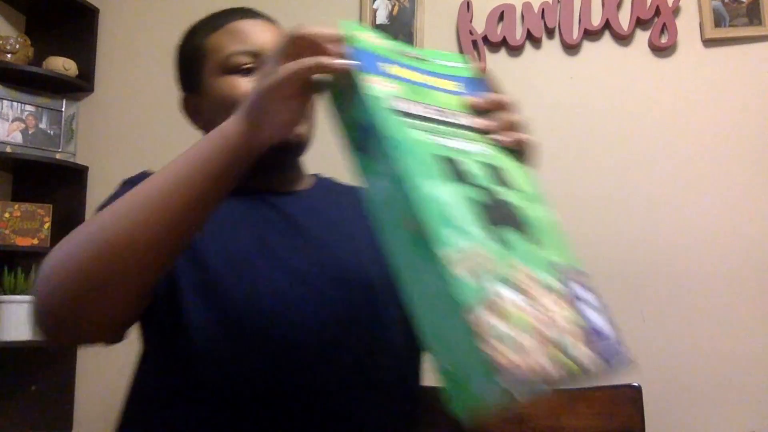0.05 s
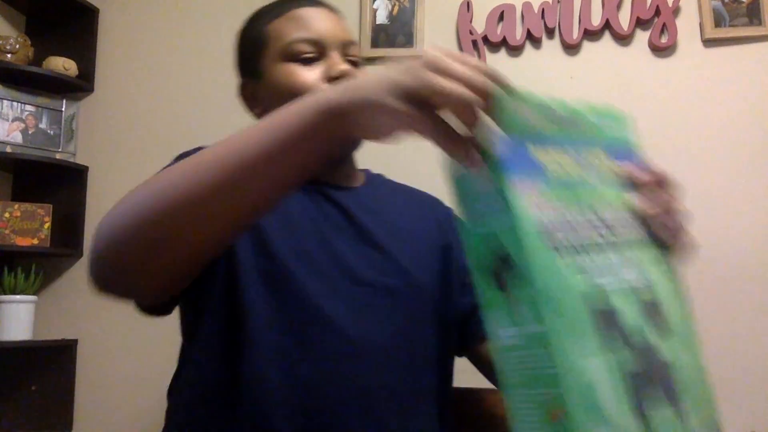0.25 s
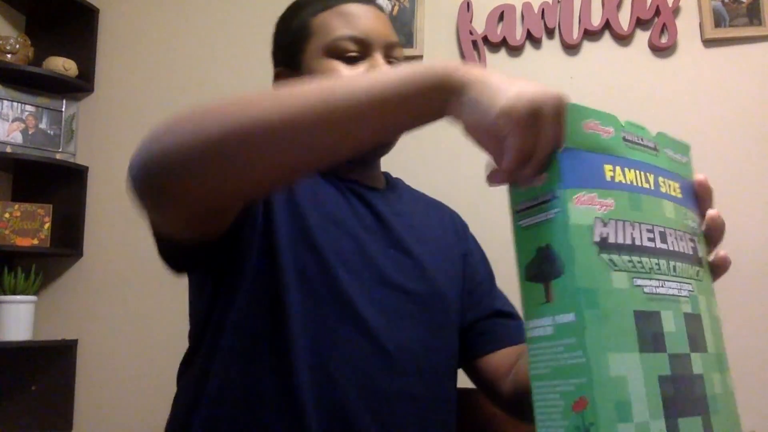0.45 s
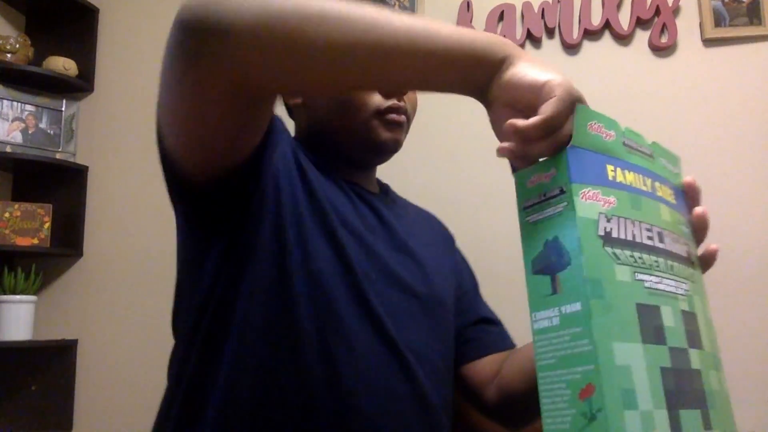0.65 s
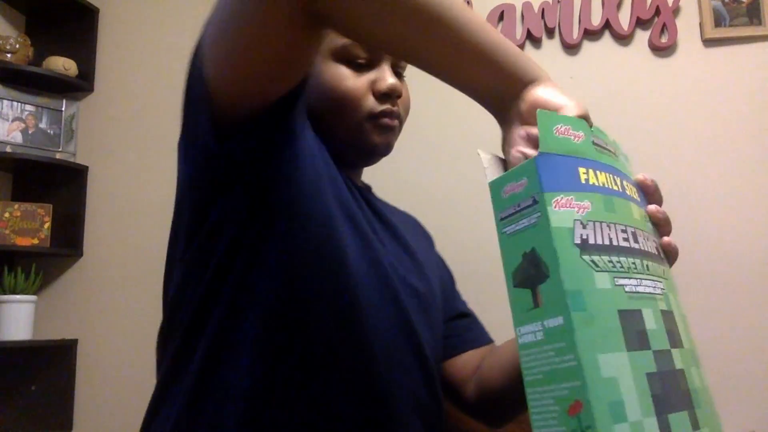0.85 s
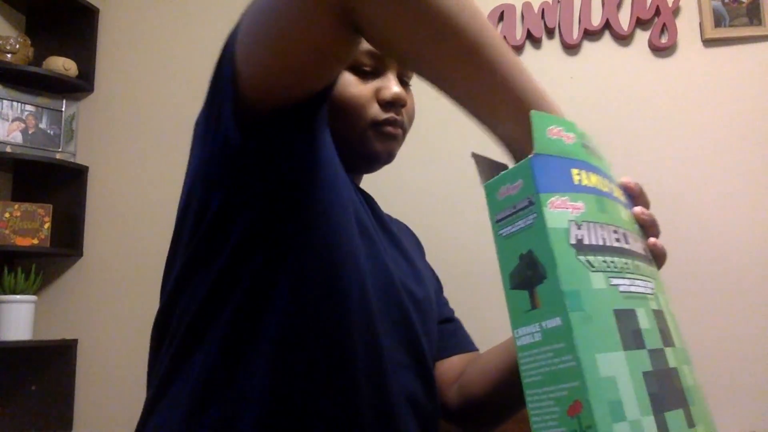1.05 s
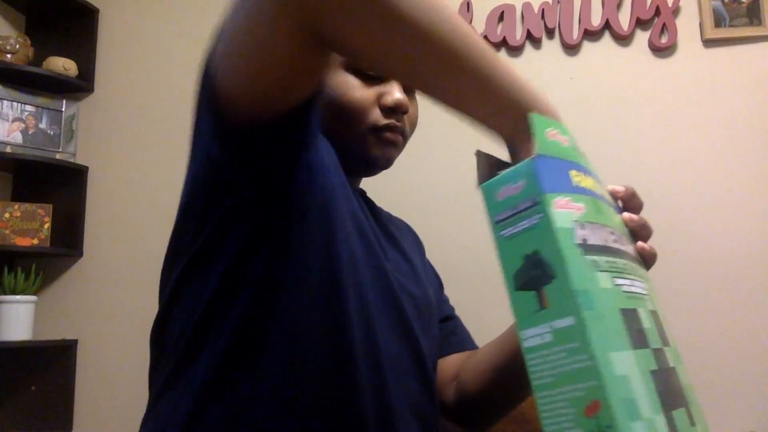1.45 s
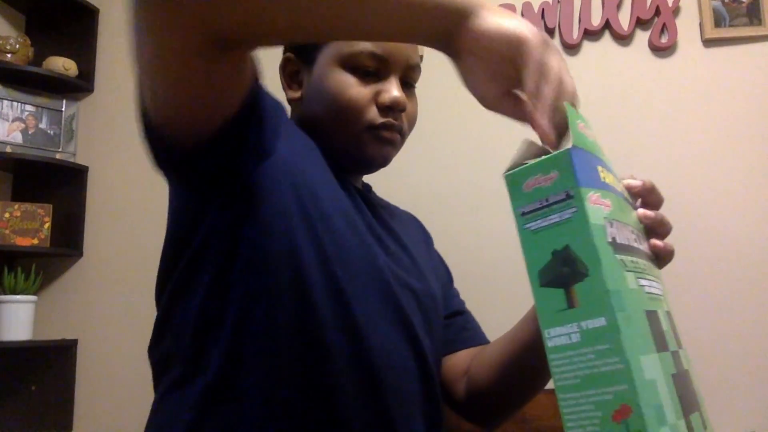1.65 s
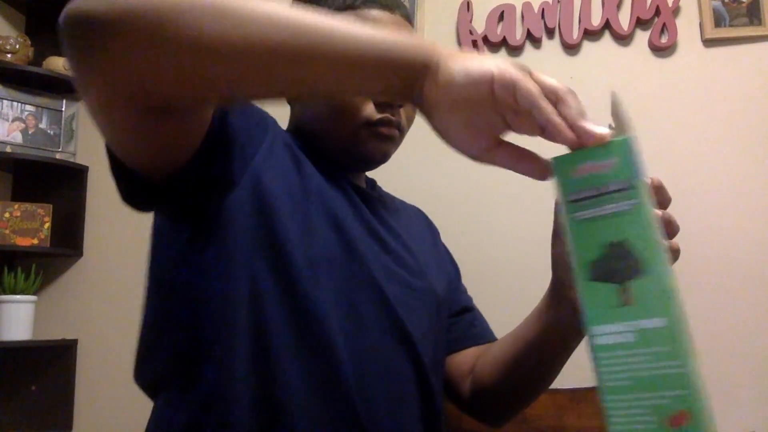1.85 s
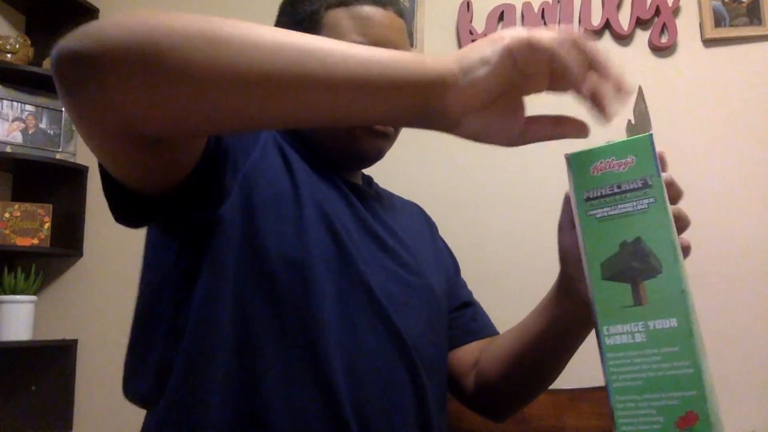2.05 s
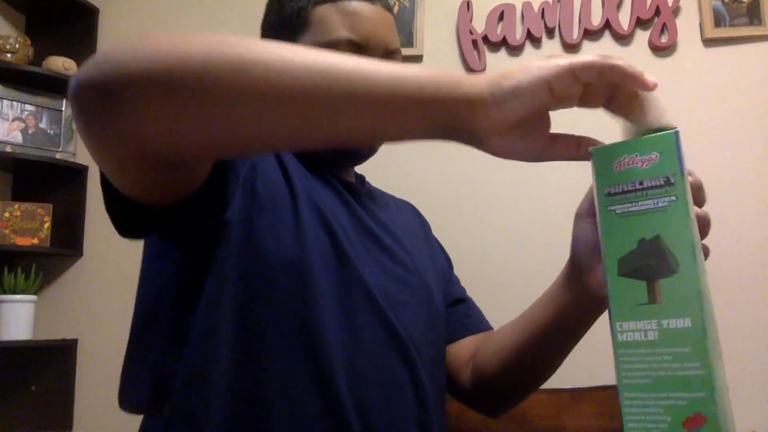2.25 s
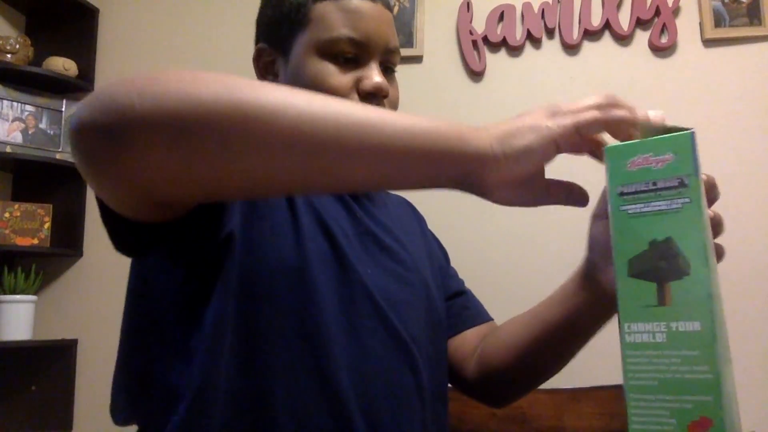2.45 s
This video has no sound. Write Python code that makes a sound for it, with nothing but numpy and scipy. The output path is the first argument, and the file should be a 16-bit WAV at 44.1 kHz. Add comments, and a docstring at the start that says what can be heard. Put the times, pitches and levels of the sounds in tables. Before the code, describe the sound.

A cereal box's plastic liner crinkles as a hand digs through the cereal, just after the box thumps loudly onto a wooden table. Fingers then knock the cardboard and flick its flaps, close to the microphone in a small room.

```python
"""A cereal box thumps down on a wooden table in a small room, and the cereal settles inside.
Box and table ring together, overloading the nearby microphone. A hand pushes into the plastic liner,
digs through the cereal and comes out: swarms of tiny clicks, with creases snapping and ticking.
Fingers slide over the cardboard, knock its hollow panels and flick its stiff flaps."""
import sys
import numpy as np
from scipy import signal
from scipy.fft import rfft, irfft
from scipy.io import wavfile
from scipy.ndimage import uniform_filter1d

SR = 44100
rng = np.random.default_rng(int(sys.argv[2]) if len(sys.argv) > 2 else 0)


def store_pcm(level_fs):
    """Save levels as 16-bit WAV."""
    pcm = np.round(np.clip(level_fs, -1, 1) * 32767).astype(np.int16)
    wavfile.write(sys.argv[1], SR, np.atleast_2d(pcm).T)


N = 110250
T = np.arange(N) / SR

# mid-range crinkle of the liner (frequency [Hz], level [dB])
CRINKLE_SPECTRUM = [(300, -42.5), (900, -30), (1600, -4.5), (2400, 1.5), (3300, 1.5), (4400, 0), (5500, -5),
                    (7000, -18), (10000, -47), (16000, -10)]
# airy top-end fizz (frequency [Hz], level [dB])
FIZZ_SPECTRUM = [(3000, -45), (7000, -25), (10000, -11), (12500, -1), (15000, 1), (17000, -5)]
# dull thud of the box (frequency [Hz], level [dB])
THUD_SPECTRUM = [(45, -30), (70, 5), (200, -7.5), (450, -7.5), (700, -8.5), (1100, -16), (2000, -22),
                 (5000, -40)]
# the box lands and bounces once (time [s], level [dB])
LANDINGS = [(0.2438, 1), (0.2558, -5)]
# modes of table and box together (frequency [Hz], level [dB], t60 [s])
TABLE_MODES = [(72, -17, .27), (112, -15, .24), (140.5, -13, .33), (182, -15, .28), (222, -6, .1),
               (268, -7, .12), (333, -3, .125), (1110, -20, .11)]
LANDING_AT_S, FINGER_RISE_S = LANDINGS[0][0], .0013


def amp(db):
    """Decibels to gain."""
    return 10 ** (np.asarray(db) / 20)


def unit(x):
    """Scales to rms 1."""
    return x / np.sqrt(np.mean(x ** 2) + 1e-20)


def curve_at(points, hz):
    """Reads a curve on a log-frequency axis."""
    f, value = np.transpose(points)
    return np.interp(np.log(hz + 1), np.log(f), value)


def fader(points, after_db=None):
    """Gain that rides through (time [s], level [dB]) points."""
    return amp(np.interp(T, *np.transpose(points), right=after_db))


def colour(x, spectrum):
    """Minimum-phase EQ with the given spectrum; the result has rms 1."""
    hz = np.fft.rfftfreq(4096, 1 / SR)
    cepstrum = irfft(np.log(amp(curve_at(spectrum, hz))))
    half = len(cepstrum) // 2
    fold = np.r_[1, np.full(half - 1, 2), 1, np.zeros(half - 1)]
    impulse = irfft(np.exp(rfft(cepstrum * fold)))
    return unit(signal.oaconvolve(x, impulse)[:N])


def lowpass(x, hz):
    """Steep low-pass."""
    return signal.oaconvolve(x, signal.firwin(301, hz, window=("kaiser", 8), fs=SR), "same")


def resonate(x, hz, q):
    """Two passes through one resonant band; the result has rms 1."""
    band = signal.iirpeak(hz, q, fs=SR)
    return unit(signal.lfilter(*band, signal.lfilter(*band, x)))


def burst(start, decay_s, rise_s=0.00044):
    """Envelope with a quick attack and an exponential fall."""
    t = np.maximum(T - start, 0)
    return (1 - np.exp(-t / rise_s)) * np.exp(-t / decay_s)


def ring(start, modes, rise_s=FINGER_RISE_S):
    """Decaying modes struck at one moment."""
    return -sum(amp(db) * burst(start, t60 / np.log(1000), rise_s) * np.sin(2 * np.pi * hz * (T - start))
                for hz, db, t60 in modes)


def noise(spectrum):
    """Coloured noise of rms 1."""
    return colour(rng.standard_normal(N), spectrum)


def grains(per_s=1300, spread_db=2.1, clump_db=2.5, clump_s=.004):
    """Clumped train of tiny clicks, a few of them much larger than the rest."""
    clumps = unit(uniform_filter1d(rng.standard_normal(N), int(clump_s * SR)))
    size_db = spread_db * np.minimum(rng.exponential(1, N), 4) + clump_db * clumps
    return amp(size_db) * rng.choice([-1, 1], N) * (rng.random(N) < per_s / SR)


def facets(x, depth_db=2, patch_s=.018, patch_hz=450):
    """Each spot that crackles has its own colour, so the timbre shifts from moment to moment."""
    bands = signal.stft(x, SR, nperseg=256, noverlap=192)[2]
    patches = uniform_filter1d(rng.standard_normal(bands.shape), round(patch_hz * 256 / SR), axis=0)
    patches = unit(uniform_filter1d(patches, round(patch_s * SR / 64), axis=1))
    return signal.istft(bands * amp(depth_db * patches), SR, nperseg=256, noverlap=192)[1][:N]


def room(x, wet_db):
    """Adds a tail of sparse reflections, each band dying at its own speed."""
    # reverb time of the small room (frequency [Hz], t60 [s])
    decay_times = [(100, 0.55), (500, 0.18), (2000, 0.5461), (6000, 0.52), (15000, 0.19)]
    count = SR // 2
    taps = rng.standard_normal(count) * (rng.random(count) < .1) * (T[:count] > .003)
    hz, t, bands = signal.stft(taps, SR, nperseg=256)
    tail = signal.istft(bands * amp(-60 * t / curve_at(decay_times, hz)[:, None]), SR)[1]
    return x + amp(wet_db) * signal.fftconvolve(x, tail / np.linalg.norm(tail))[:N]


def moving_room(x, wet_db, count=4, crossfade_s=.05):
    """Reflections change as hand and box move: the sound crossfades round several reverb tails."""
    place = T / crossfade_s
    shares = [np.maximum(1 - abs((place - k + 1) % count - 1), 0) for k in range(count)]
    sends = [x * np.sqrt(share) for share in shares]
    return x + sum(room(send, wet_db) - send for send in sends)


def room_tone(air_db=-57, hum_hz=294, hum_db=-54.5):
    """A bed of quiet air and a faint hum."""
    # dark room air (frequency [Hz], level [dB])
    air_spectrum = [(40, -21), (130, 6.5), (300, 7), (500, 0), (1000, -25), (3000, -25.5), (7000, -23.5),
                    (16000, -25)]
    return amp(air_db) * noise(air_spectrum) + amp(hum_db) * np.sin(2 * np.pi * hum_hz * T)


def finger_slide():
    """Fine friction of skin on the printed cardboard."""
    # swell of the slide (time [s], level [dB])
    swell = [(0, -47), (.03, -39), (.075, -35), (.115, -56), (.15, -72)]
    friction = resonate(facets(rng.standard_normal(N)), hz=2750, q=1.87)
    return friction * fader(swell, after_db=-np.inf)


def press_and_drag():
    """The walls of the box rumble under the hand; the table hums as the box grazes it."""
    # low rumble of the walls (frequency [Hz], level [dB])
    wall_spectrum = [(25, -7), (70, -29), (140, -7.5), (250, -5.5), (330, -1), (500, -6), (900, -41),
                     (2000, -54)]
    # hand pressing on the walls (time [s], level [dB])
    press = [(.1, -56), (.19, -52), (.3, -60), (.95, -53), (1.08, -46.5), (1.13, -32), (1.19, -29),
             (1.24, -59), (1.3, -39), (1.36, -114), (1.55, -42), (1.68, -85)]
    # box dragging into its landing (time [s], level [dB])
    drag = [(.15, -60), (.175, -40), (.24, -38), (.26, -70)]
    rumble = colour(grains(), wall_spectrum)
    hum = resonate(noise(wall_spectrum), hz=TABLE_MODES[2][0], q=6)
    return rumble * fader(press) + hum * fader(drag)


def rim_bump(at_s=1.766, db=-33.5):
    """The hand bumps the rim with a soft thud as it leaves the box."""
    return amp(db) * noise(THUD_SPECTRUM) * burst(at_s, decay_s=.02, rise_s=FINGER_RISE_S)


def flap_flicks(click_t60=.011, sub_db=-10, tail_db=-22, tail_width=.05):
    """Flap edges slip with a pitched click and a weaker one an octave below; a narrow ringing tail follows each
    click."""
    # slipping edges (time [s], level [dB], pitch [Hz], fizz level [dB])
    flicks = [(1.623, -27, 2010, -64), (2.128, -30.5, 2540, -72), (2.2138, -14, 3310, -37),
              (2.219, -26.5, 5620, -41), (2.26, -27.5, 4550, -50), (2.36, -24.5, 3010, -55),
              (2.456, -22, 5340, -51), (2.4637, -24, 4440, -57)]
    out, fizz, f = np.zeros(N), noise(FIZZ_SPECTRUM), np.fft.rfftfreq(N, 1 / SR)
    for s, db, hz, fizz_db in flicks:
        click = ring(s, [(hz, 0, click_t60), (hz / 2, sub_db, click_t60)])
        resonance = 1 / (1 + ((f / hz - 1) / tail_width) ** 2)
        flap = unit(irfft(rfft(rng.standard_normal(N)) * resonance, N))
        out += amp(db) * (click + amp(tail_db) * flap * burst(s, decay_s=.028))
        out += amp(fizz_db) * fizz * burst(s, decay_s=.012)
    return out


def finger_knocks():
    """A finger rings one cardboard panel and the hollow box, with a short scuff."""
    # knocks (time [s], panel level [dB], pitch [Hz], t60 [s], hollow level [dB], scuff level [dB])
    knocks = [(.695, -26, 620, 0.055, -51, -46), (1.478, -19, 851, 0.048, -50.5, -37),
              (1.766, -29, 578, 0.096, -43, -36), (1.965, -25, 568, 0.032, -38, -42.5),
              (2.216, -27.5, 614, 0.061, -64, -36), (2.264, -18, 570, 0.043, -34.5, -37),
              (2.332, -42, 720, 0.055, -45, -38.5), (2.458, -14, 590, 0.074, -38.5, -23.5)]
    # hollow modes of the box (frequency [Hz], level [dB], t60 [s])
    box_modes = [(145, 1, 0.31), (190, -4, 0.106), (255, -3.5, 0.174), (400, -19, 0.11), (448, 13, 0.03),
                 (1100, -23, .1)]
    # fingertip scuff (frequency [Hz], level [dB])
    scuff_spectrum = [(90, -19.5), (300, 1), (600, -3), (1100, -6), (1900, -12), (3500, -25), (7000, -25),
                      (16000, -56)]
    out, scuff = np.zeros(N), noise(scuff_spectrum)
    for s, db, hz, t60, hollow_db, scuff_db in knocks:
        out += ring(s, [(hz, db, t60)]) + amp(hollow_db) * ring(s, box_modes)
        out += amp(scuff_db) * scuff * burst(s, decay_s=.014, rise_s=FINGER_RISE_S)
    return out


def liner_ticks(hz=12800, decay_s=.00014):
    """Single very short, bright ticks of stiff plastic."""
    # ticks (time [s], peak level [dB], low cut [Hz])
    ticks = [(.6285, -15, 3000), (.7772, -7, 4000), (1.1382, 1.5, 3000), (1.1665, -12, 7000),
             (1.178, -14, 9000), (1.208, -12, 11000), (1.7459, -9.5, 11000)]
    out = np.zeros(N)
    for s, db, low_hz in ticks:
        t = np.maximum(T - round(s * SR) / SR, 0)
        tick = np.exp(-t / decay_s) * np.sin(2 * np.pi * hz * t)
        tick = signal.sosfilt(signal.butter(2, low_hz, "high", fs=SR, output="sos"), tick)
        out += amp(db) * tick / abs(tick).max()
    return out


def crease_snaps(ring_hz=(2000, 4200)):
    """Larger creases of the liner give way in sudden bursts, each with a resonance of its own."""
    # snaps (time [s], body level [dB], fizz level [dB], decay [s])
    snaps = [(0.017, -38, -32, 0.0029), (0.129, -32, -55, 0.0018), (0.156, -23.5, -54, .002),
             (.288, -19, -20, 0.0092), (0.36, -15, -16, 0.0028), (0.4933, -20, -28, .005),
             (0.506, -31, -20, 0.0047), (.544, -30, -28, 0.0033), (0.628, -22, -33, 0.0047),
             (0.749, -34, -30.5, .004), (.856, -25, -39, 0.01), (0.901, -24.5, -40, 0.015),
             (0.9266, -8.5, -20, 0.0026), (0.9943, -16.5, -29, 0.0086), (1.07, -20.5, -30.5, 0.017),
             (1.1924, -15.5, -21, 0.0049), (1.308, -23.5, -40.5, 0.0066), (1.347, -24.5, -34, 0.014),
             (1.384, -24, -27, 0.01), (1.442, -23.5, -40, 0.02), (1.552, -24.5, -58, 0.0043)]
    out, body, fizz = np.zeros(N), noise(CRINKLE_SPECTRUM), unit(facets(noise(FIZZ_SPECTRUM)))
    for s, db, fizz_db, decay_s in snaps:
        crease = signal.lfilter(*signal.iirpeak(rng.uniform(*ring_hz), Q=3, fs=SR), body)
        out += burst(s, decay_s, rise_s=0.00023) * (amp(db) * unit(body + crease) + amp(fizz_db) * fizz)
    return out


def cereal_rustle():
    """Liner and cereal crackle under the hand and settle after the landing, in four grain layers."""
    # hand movement (time [s], crinkle level [dB], fizz level [dB], cereal level [dB])
    gesture = [(0, -42.5, -71, -61), (0.028, -35, -32.5, -44.5), (.113, -57, -89, -51),
               (.169, -43, -51, -38.5), (.235, -55, -55, -54.5), (.485, -51, -53, -74),
               (0.498, -28.5, -53, -34.5), (.557, -24.5, -19.5, -32), (.6, -52, -45, -73),
               (.65, -29.5, -40, -48.5), (.72, -37.5, -70, -49.5), (.77, -33.5, -42, -43.5),
               (0.839, -40.5, -63, -47.5), (.9, -27, -35.5, -34.5), (.935, -23.5, -22.5, -31.5),
               (.975, -26.5, -30.5, -33), (1.01, -24, -28, -26.5), (1.125, -26.5, -30.5, -28.5),
               (1.198, -25, -29, -22.5), (1.257, -37.5, -47, -38), (1.33, -37, -50, -36),
               (1.39, -29.5, -41, -36.5), (1.5, -32, -36, -37.5), (1.561, -40.5, -67, -34.5),
               (1.6, -77, -74, -54), (1.68, -61, -60, -55), (1.86, -62.5, -85, -60),
               (1.9, -51.5, -58.5, -56), (2.08, -67, -87.5, -64), (2.169, -57, -62, -54),
               (2.42, -64.5, -70, -59)]
    # body of the stirred cereal (frequency [Hz], level [dB])
    cereal_spectrum = [(120, -46.5), (250, -8.5), (450, -7.5), (600, 4), (760, -2.5), (980, 3),
                       (1400, -4.5), (2200, -3.5), (4000, -27.5)]
    # hard, bright crackle (frequency [Hz], level [dB])
    crackle_spectrum = [(2000, -12.5), (5000, -0.5), (7500, -3.5), (10500, 2), (15000, -32.5)]
    times, crinkle_db, fizz_db, cereal_db = np.transpose(gesture)
    crackle_db = 12.5 + 1.805 * crinkle_db  # grows faster than the crinkle
    layers = [(CRINKLE_SPECTRUM, crinkle_db, -17.5, .09), (FIZZ_SPECTRUM, fizz_db, -25, .12),
              (cereal_spectrum, cereal_db, -15.5, .08), (crackle_spectrum, crackle_db, -25, .12)]
    out = np.zeros(N)
    for spectrum, stir_db, settle_db, settle_s in layers:
        stirring = amp(np.interp(T, times, stir_db))
        settling = amp(settle_db) * burst(LANDING_AT_S, settle_s)
        out += np.hypot(stirring, settling) * colour(facets(grains()), spectrum)
    return out


def box_landing(thud_db=-13, thud_decay_s=.028, rise_s=.001):
    """The full box hits the table top and bounces: low wooden modes over a dull thud."""
    modes = sum(amp(db) * ring(s, TABLE_MODES, rise_s) for s, db in LANDINGS)
    return modes + amp(thud_db) * noise(THUD_SPECTRUM) * burst(LANDING_AT_S, thud_decay_s, rise_s)


def scene():
    """Handling and hits in the room, in mono; the ticks bypass the mix's low-pass."""
    handling = cereal_rustle() + crease_snaps() + press_and_drag() + rim_bump() + finger_slide()
    mix = moving_room(handling, wet_db=-8)
    mix += room(finger_knocks(), wet_db=-10)
    mix += room(flap_flicks(), wet_db=-20)
    mix += room(box_landing(), wet_db=-16)
    return (lowpass(mix + room_tone(), hz=15800) + room(liner_ticks(), wet_db=-15))[None]


def record(dry, low_cut_hz=72, top_hz=16700):
    """The microphone sheds deep bass and clips on the thump; a low-pass trims the very top."""
    x = signal.sosfilt(signal.butter(3, low_cut_hz, "high", fs=SR, output="sos"), dry[0])
    return lowpass(np.clip(x, -1, 1), top_hz)[None]


dry = scene()
out = record(dry)
store_pcm(out)
```